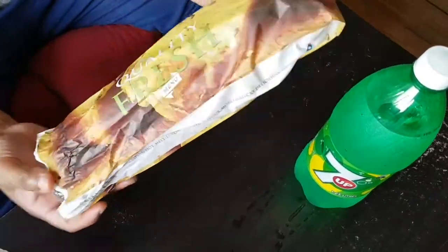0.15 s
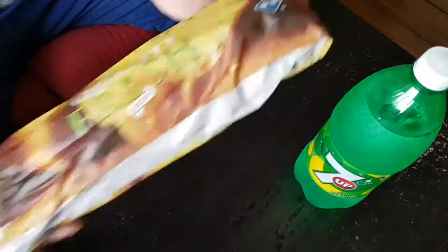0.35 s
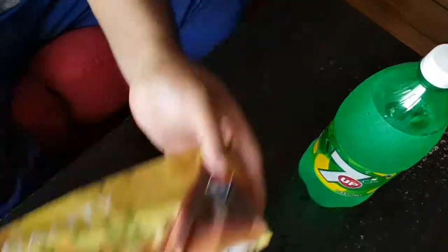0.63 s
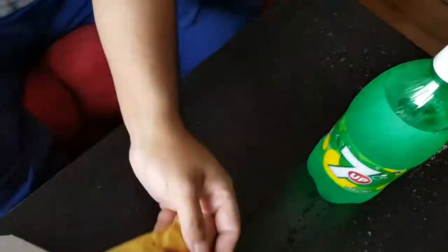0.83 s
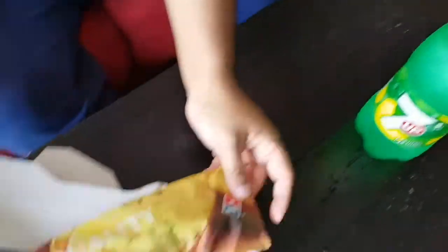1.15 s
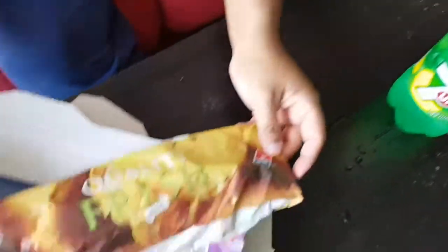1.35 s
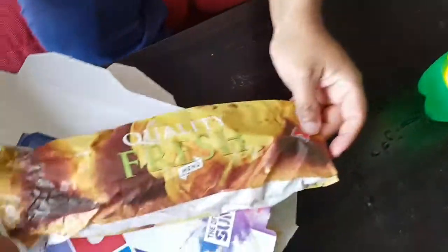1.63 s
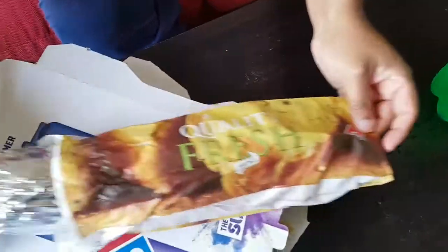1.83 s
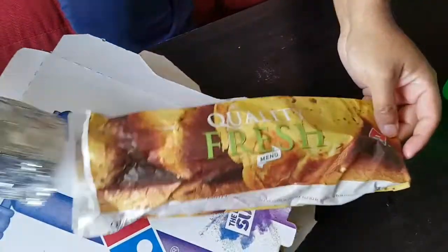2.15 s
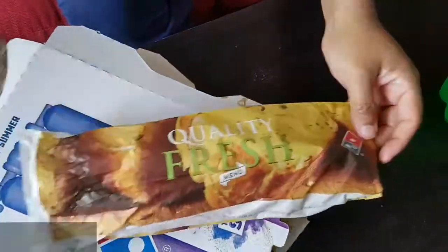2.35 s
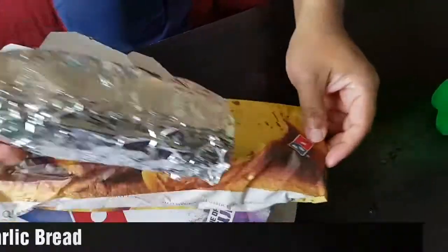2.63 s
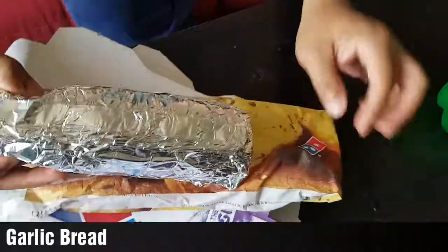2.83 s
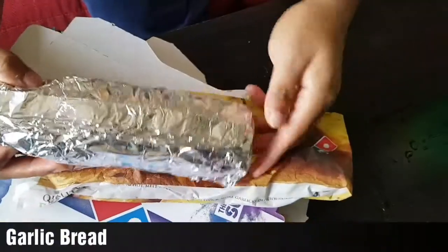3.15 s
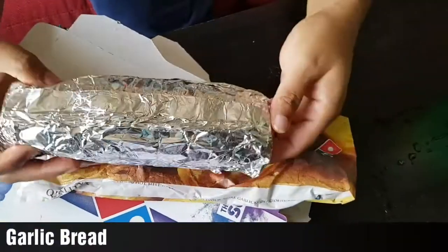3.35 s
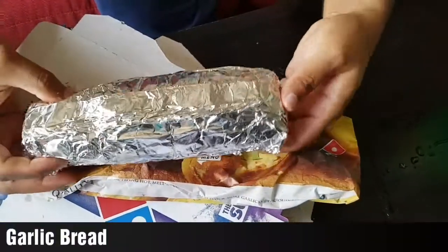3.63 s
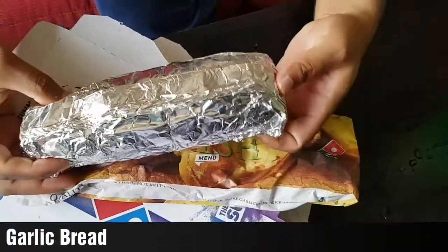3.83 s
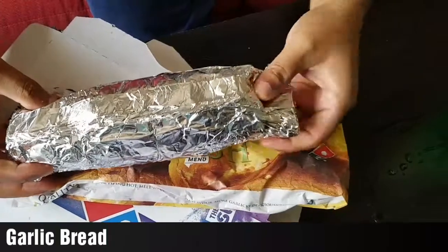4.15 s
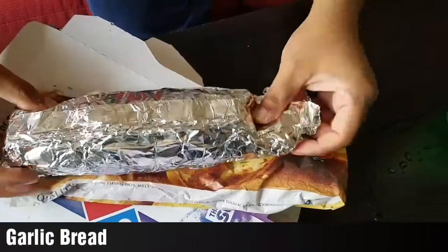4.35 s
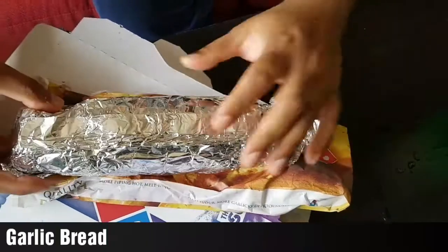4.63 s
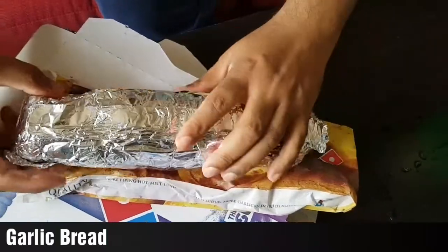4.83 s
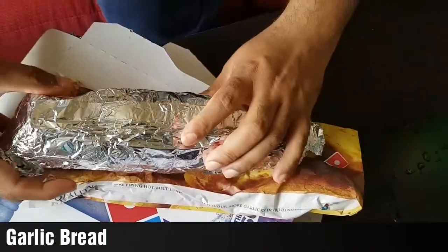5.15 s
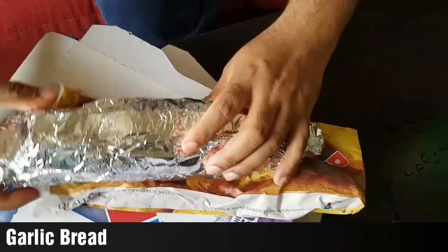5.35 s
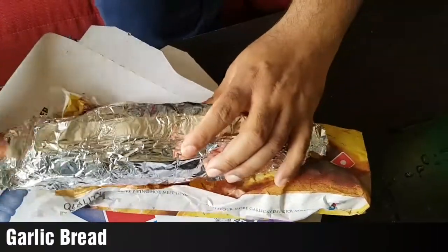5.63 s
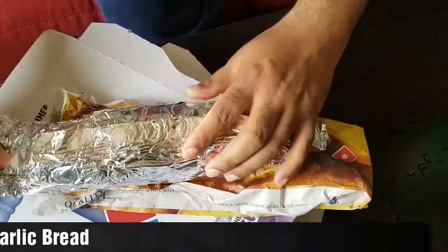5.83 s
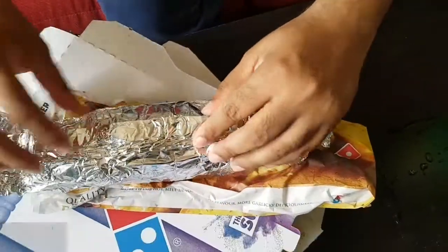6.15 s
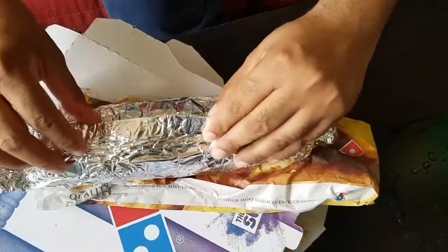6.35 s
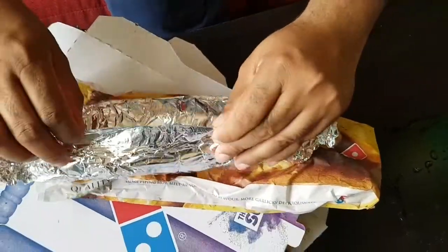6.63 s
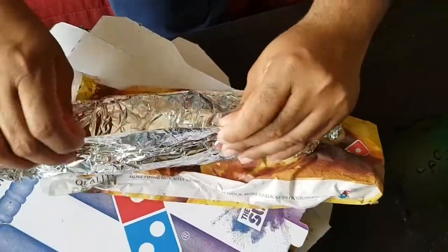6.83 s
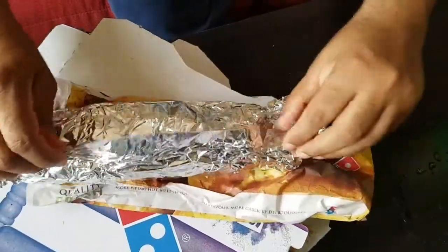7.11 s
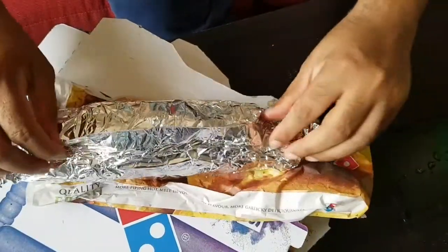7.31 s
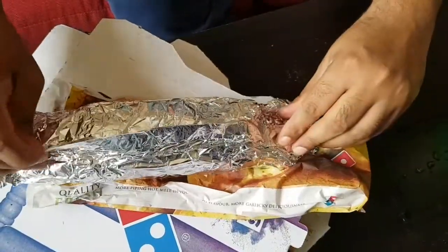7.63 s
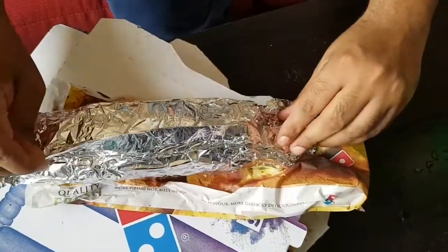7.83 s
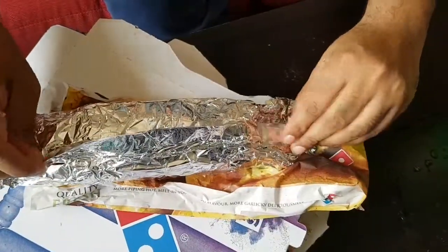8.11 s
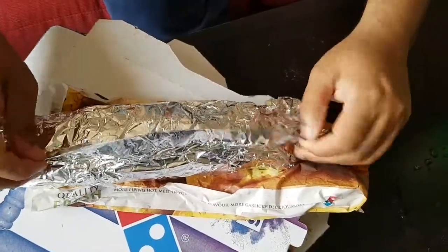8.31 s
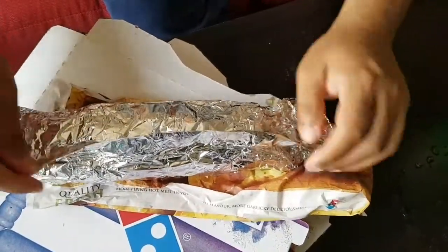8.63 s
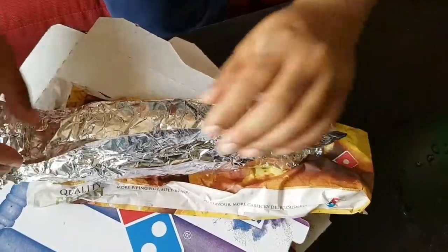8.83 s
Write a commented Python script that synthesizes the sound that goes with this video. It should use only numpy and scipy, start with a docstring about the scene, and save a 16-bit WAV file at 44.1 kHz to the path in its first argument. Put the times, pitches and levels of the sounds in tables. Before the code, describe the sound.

A paper bag crackles in busy hands, a loaf wrapped in foil slides out with a rasp, then the foil crinkles and snaps open indoors.

```python
"""Crackling paper and foil: hands turn a paper bag, slide a foil-wrapped loaf out and peel the foil open.
Big creases snap singly: noise and a jolt ring a panel while the edge cracks.
Small creases come in clumps as a rustle: random clicks ring banks of resonators.
A hollow hum and a gliding finger rub, both foil, join in a small room with short echoes and a faint hush.
Two microphone ports a few centimetres apart hear each crease with its own lag and balance."""
import sys
import numpy as np
from scipy import signal
from scipy.fft import rfft, irfft
from scipy.io import wavfile

SR = 44100
rng = np.random.default_rng(int(sys.argv[2]) if len(sys.argv) > 2 else 0)


def put_to_file(sound):
    """Save the sound as 16-bit audio at rate SR, in the file named by the first command-line argument."""
    columns = np.atleast_2d(sound).T  # one column per channel
    safe = np.clip(columns, -1, 1)
    whole_steps = np.round(safe * 32767)
    wavfile.write(sys.argv[1], SR, whole_steps.astype(np.int16))


N = 395577

# Faint hush of the room: hz, level_db (relative, per Hz)
ROOM_TONE = [(15, -35), (25, 10), (48, 6), (185, 5.5), (354, -3), (659, -1), (863, -17), (16000, -15)]
ROOM_TONE_DB = -58   # rms ahead of the microphone
ROOM_T60_S, ROOM_TREBLE_T60_S = .36, .33   # time for the echoes to fall 60 dB
ROOM_DB = -9.5   # echo gain on the mean of the two ports

# Colour of the microphone: hz, level_db
MICROPHONE = [(20, -4.5), (5000, 0.5), (7500, -8.5), (11000, -4), (15000, -9), (16000, -31), (20000, -15)]
# Colour difference of the ports: hz, left_minus_right_db
PORT_BALANCE = [(60, -2), (700, 1), (1300, 1.5), (2400, 2), (4400, -6.5), (7000, 0.5), (15000, 1)]
CUTOFF_HZ = 16800   # edge of the stopband
PORT_LAG_S = .00012   # spread of a small crease's lag between the ports
LAG_S_PER_DB = .00002   # a big crease reaches the louder port earlier

# Finger rubbing along the foil: start_s, pitch_hz, level_db (the wavering adds about 5 dB)
RUB = [(5.86, 564, -58), (5.916, 618.5, -53), (5.965, 753, -48), (6.0, 865, -70)]
RUB_WIDTH_HZ = 57   # how fast the tone wavers

# Light handling under everything: start_s, body_db, treble_db (rustle drive, ahead of layer trims)
TOUCH = [(0, -47, -51), (0.299, -48, -58), (.75, -43.5, -49.5), (1.1, -48, -54.5), (1.4, -40.5, -47),
         (2.151, -34, -35), (2.33, -49, -50.5), (3.5, -50.5, -51.5), (4.0, -52, -47.5), (4.439, -32, -36),
         (4.75, -50, -55), (5.15, -50.5, -48), (5.5, -38.5, -40.5), (6.05, -40, -40.5), (6.37, -61, -62),
         (6.65, -40, -44), (7.3, -38.5, -44), (7.899, -43, -44), (8.129, -51.5, -52.5),
         (8.381, -35.5, -35.5), (8.64, -44.5, -48.5), (8.89, -63, -100), (8.97, -44.5, -39.5)]
# A hand squeezes, pulls or folds: start_s, length_s, body_db (drive), treble_db (against the body)
GRIPS = [(0, 0.046, -33.5, -4), (0.126, 0.011, -38.5, -5), (0.393, 0.012, -44, -7),
         (0.479, 0.0079, -32.5, -8), (0.548, 0.02, -45.5, -3.5), (0.82, 0.09, -28.5, -8.5),
         (1.093, 0.015, -44, -7.5), (1.206, 0.023, -36, -9.5), (1.298, 0.011, -36.5, -7.5),
         (1.398, 0.03, -30, -9), (1.496, 0.015, -31, -5.5), (1.592, 0.085, -32.5, -3.5),
         (1.789, 0.23, -29.5, 0.5), (2.115, 0.015, -45, -4), (2.45, 0.015, -35.5, -7),
         (2.745, 0.11, -28.5, -6.5), (3.111, 0.061, -33, -7.5), (3.227, 0.059, -31.5, -1.5),
         (3.568, 0.017, -40, -3), (3.703, 0.079, -40.5, -4.5), (3.848, 0.016, -37, -18),
         (4.441, 0.13, -31.5, -5), (4.885, 0.016, -32.5, -6), (4.946, 0.011, -32.5, -4.5),
         (5.044, 0.056, -42.5, -8), (5.517, 0.029, -36, -4), (5.839, 0.01, -35, -2.5),
         (5.924, 0.03, -35, -3), (6.008, 0.016, -36, 0), (6.882, 0.02, -36, -5), (6.992, 0.028, -32.5, -3),
         (7.102, 0.035, -33, -6.5), (7.505, 0.068, -34.5, -4), (7.632, 0.022, -39, 0),
         (8.361, 0.03, -33.5, -9.5), (8.67, 0.043, -36.5, -2)]
GRIP_DB_PER_S, LET_GO_DB_PER_S = 610, 207   # how fast a grip builds, and how fast the sheets settle after it

# The loaf slides out of the bag, rubbing evenly: start_s, share (0-1; end values hold outside the table)
SLIDE = [(1.76, 1), (1.81, 0.87), (2.05, 1), (2.09, 0.2)]
# Low flapping of the whole bag: start_s, level_db (against the body drive)
FLAP = [(0, -9), (1.5, -10.5), (2.2, -12.5), (3, -12.5), (4, -11), (6.5, -14.5), (9, -15)]
# Hum of the hollow foil tube: start_s, level_db (against a body drive of -45 dB)
TUBE = [(0, -19), (2.75, -13), (3.0, -5), (3.9, -5), (4.5, -3), (5.6, -4), (6.3, -22), (9, -22)]
# Whole-sheet motion: hz, level_db (relative)
SHEET = [(45, -24), (90, -4), (170, 4), (340, 4)]
# Panels of the sheets: hz, level_db (relative)
BODY = [(400, -7), (600, -1.5), (1000, -4), (1600, -6), (2300, -2), (3200, -4.5)]
# Sharp crease edges: hz, level_db (relative)
TREBLE = [(3200, -10), (4800, -9.5), (7500, -5.5), (11500, -9), (15000, -6)]

# Big single snaps: start_s, level_db (panel peak, ahead of SNAP_TRIM_DB), pitch_hz (panel),
# crack_db (about the crack's rms, against the panel's peak), pan_db (left minus right)
SNAPS = [(0.058, -19, 1020, -11, 5), (0.072, -28.5, 440, 7, -3.5), (0.13, -22.5, 444, 0.5, 2),
         (0.231, -29, 4850, -6, -4), (0.276, -24.5, 1510, -3.5, -3), (0.304, -21, 715, 0.5, -2.5),
         (0.388, -25.5, 1890, -1.5, 0), (0.405, -32, 2830, -14, 0), (0.455, -23, 650, -28, 2),
         (0.474, -15.5, 1230, -0.5, -2), (0.49, -21.5, 2350, -3, -4), (0.574, -22, 1510, -9, -6),
         (0.606, -24.5, 1150, -5, 2), (0.613, -19.5, 4840, -8, -2), (0.651, -38, 2800, 8, -0.5),
         (0.669, -24, 1400, -15, -2), (0.697, -18, 1660, -17, 2), (0.719, -14, 1430, -8.5, -2),
         (0.7435, -11.5, 1900, -10, 4), (0.755, -9.5, 2300, -21, 2), (0.812, -12.5, 2090, -2, 4),
         (0.831, -14, 1900, -15, -1.0), (0.853, -16, 940, -4, -1), (0.871, -12, 800, 0, 5.5),
         (0.907, -10, 1260, -3.5, 3), (0.921, -12, 1040, -7, 3), (1.094, -16, 680, -17, 2),
         (1.183, -21, 2570, -10, -2.5), (1.206, -23.5, 555, -26, 6), (1.239, -23, 820, -20, -3),
         (1.26, -15.5, 5170, -3.5, -1.5), (1.279, -24, 745, -25, -1), (1.299, -14.5, 1360, -23, -2),
         (1.386, -16, 990, -8, -1), (1.397, -15.5, 4200, -11, -2), (1.453, -20.5, 810, -28, -1.5),
         (1.467, -15, 1730, -6, -7), (1.507, -11.5, 1520, -21, -5), (1.518, -10, 1550, -10, -1.5),
         (1.574, -17, 1240, -6, 0), (1.583, -11, 1160, -7, -3), (1.59, -18, 3500, -15, 2),
         (1.62, -14, 3920, -9, 4), (1.678, -22.5, 438, -25, 0), (1.6915, -8.5, 1350, -37, 3.5),
         (1.734, -12, 1510, -6.5, -5), (1.761, -16, 1560, -9, 3), (1.788, -13, 1260, -4, -4),
         (1.814, -10.5, 3400, -24, 1), (2.103, -8.5, 1270, -20, 0), (2.224, -27, 1020, -13, -2),
         (2.385, -29.5, 1070, -2, -10), (2.445, -30, 407, -22, 1), (2.47, -19.5, 1260, -2, 1),
         (2.559, -27.5, 1250, -26, -5), (2.628, -27.5, 1160, -22, 2), (2.66, -18, 3850, -12, 3),
         (2.736, -13, 985, -5.5, -1), (2.748, -12.5, 3860, -6, 7.5), (2.783, -16, 3630, -18, -2),
         (2.795, -12.5, 2540, -21, 1), (2.821, -12.5, 980, -4, -3), (2.849, -12, 1140, -19, 2),
         (2.866, -17, 990, -26, 6), (2.9, -24, 980, -1.5, 1), (2.907, -20, 1960, -13, -3),
         (3.09, -20.5, 914, -32, 2), (3.113, -17, 1390, -8, 4), (3.122, -14, 3930, -14, 0),
         (3.154, -13, 3360, -5, 1.5), (3.2125, -17, 4470, -18, -9), (3.222, -20, 2480, -16, 0),
         (3.232, -31, 2200, -10, -8), (3.247, -13, 1310, -15, 4.5), (3.261, -4.5, 5070, -11, 2),
         (3.2915, -18.5, 4200, -15, -1), (3.444, -24.5, 1130, -24, 7), (3.572, -18, 1120, -8, -1),
         (3.721, -21, 990, -5, 0), (3.765, -14.5, 1800, -9, -3.5), (3.842, -17.5, 1920, -16, -1.5),
         (3.866, -19.5, 3000, -4, -2.5), (4.003, -28, 1000, -4, -4), (4.066, -19.5, 4610, -20, 3),
         (4.105, -10, 4750, -17, 4), (4.128, -11.5, 2770, -20, -3.5), (4.142, -11, 1230, -7.5, 2.5),
         (4.26, -20, 920, -5, 0), (4.357, -20, 1070, -20, 1), (4.406, -17, 640, -5, 0),
         (4.428, -24, 1230, -21, -2), (4.47, -15.5, 745, -30, 2), (4.493, -16, 1370, -9, -7),
         (4.512, -17.5, 1700, 0, -2.5), (4.543, -9.5, 1390, -8.5, -3.5), (4.631, -23, 1250, -35, -6),
         (4.723, -26.5, 960, -5, -1.5), (4.834, -25, 970, -13, -1), (4.877, -13, 1600, -10.5, -2.5),
         (4.891, -21.5, 990, 0, 8), (4.929, -19.5, 725, -4, -1), (4.9435, -2.5, 2680, -11, 3),
         (5.049, -34, 5500, 3, -3.5), (5.063, -20, 520, -20, 2), (5.093, -22, 1160, -14, 4),
         (5.121, -32, 4850, 3, 5.5), (5.16, -15.5, 4570, -27, 6.5), (5.211, -31, 1280, 4.5, 1),
         (5.304, -19.5, 2000, -6, -2.5), (5.353, -21.5, 1250, 1.5, 1), (5.377, -17.5, 4940, -1, 3),
         (5.416, -23.5, 1320, 1, 1), (5.482, -15.5, 1450, 1, -2), (5.514, -18, 1820, -24, 5),
         (5.53, -19, 1400, -10, 4), (5.556, -14.5, 1230, -8, 5.5), (5.574, -22, 5800, 1, 4),
         (5.589, -12.5, 1270, -35, 9), (5.597, -16, 1810, -36, -6), (5.621, -25, 1530, -5, 0),
         (5.733, -37, 3560, -15, 0), (5.753, -22, 1340, -28, 4), (5.778, -24.5, 770, 0, 2),
         (5.802, -19, 600, -3, 2), (5.83, -25, 4700, 9, -0.5), (5.866, -27, 2200, -18, 0),
         (5.884, -16.5, 1790, -9, 5.5), (5.937, -18, 644, -12, 3), (5.955, -13, 1080, -10, 2),
         (6.0, -25, 4570, -10, -4), (6.01, -12, 1090, -8, 1.5), (6.065, -19, 5800, -18, -1.5),
         (6.114, -20, 3480, -12, 3), (6.143, -19, 824, -16, -1), (6.197, -21.5, 3820, -24, -1.5),
         (6.232, -25.5, 5150, -6, -1.5), (6.457, -21, 4400, -13, -6), (6.494, -20, 935, -13, 1),
         (6.527, -37.5, 2500, 8, 7), (6.625, -16.5, 2560, -8, 1.5), (6.701, -26, 710, -4, -3.5),
         (6.766, -20, 1350, -15, 2), (6.773, -17, 5150, -8, -2), (6.844, -25, 1300, -3, 2),
         (6.872, -24, 4290, -8, -1), (6.887, -3.5, 4180, -28, 5), (6.93, -20.5, 764, -3, -1),
         (6.976, -19, 5000, -8, -1), (6.994, -11.5, 1440, -16, -1), (7.032, -27, 4200, -15, 1),
         (7.137, -18, 2400, -20, 2), (7.192, -24, 5500, -8, -1), (7.216, -22, 870, -7, 0),
         (7.226, -22.5, 1270, -2.5, -3), (7.3, -23, 5040, -8, -3), (7.305, -14.5, 2020, -5, -3),
         (7.376, -20, 2580, -6, 1), (7.479, -21.5, 870, -17, 1), (7.504, -20, 1350, -17, 5),
         (7.624, -14.5, 2520, -5.5, -3.5), (7.655, -30, 2700, -12, -3), (7.754, -28, 4460, -3, -2),
         (7.781, -24, 1230, -12, 1), (7.853, -26, 1190, -1, 0), (7.872, -22, 3300, -4.5, -3),
         (7.902, -25, 990, -4, 1), (7.98, -15, 1480, -3.5, -3), (7.988, -22, 1530, -18, 5),
         (8.032, -19, 3160, -16, 4), (8.066, -11.5, 1970, -19, -1.5), (8.099, -29, 4400, -4, -3),
         (8.163, -24, 4200, -11, -2), (8.199, -26, 4800, -3, 4), (8.267, -21.5, 1540, -0.5, 1),
         (8.328, -17, 2440, -12, -2), (8.357, -17, 3200, -4, 5.5), (8.389, -21.5, 1440, 3, -3.5),
         (8.411, -14.5, 1250, -14, 0), (8.462, -27, 945, -23, -1.5), (8.486, -25, 3500, -19, -7),
         (8.538, -29, 5050, 2, -4.5), (8.594, -25, 1390, -7, -1), (8.684, -18, 820, -19, 1),
         (8.798, -29.5, 5540, 2.5, 3.5), (8.935, -24.5, 4900, -15, 6)]
SNAP_TRIM_DB = -4.0
CRACK_CREST_DB = 14   # lifts crack_db to a peak level
KICK = 1.12   # jolt against the noise of the yielding panel
# Small snaps: level above the body drive, its largest deviation either way, and crack_db as above
SMALL_SNAP_DB, SMALL_SNAP_SPREAD_DB, SMALL_CRACK_DB = 19, 3, -19


def from_db(db):
    """Decibels to gain."""
    return 10 ** (np.asarray(db) / 20)


def rms_one(x):
    """Scales to rms 1."""
    return x / np.sqrt(np.mean(x ** 2) + 1e-20)


def peak_one(x):
    """Scales to peak 1."""
    return x / abs(x).max()


def at_hz(points, hz):
    """Reads a (hz, value) outline on a log-frequency axis."""
    point_hz, values = np.transpose(points)
    return np.interp(np.log(hz), np.log(point_hz), values)


def shaped(x, points, share=1):
    """Colours x by a share of a (hz, level_db) outline."""
    hz = np.maximum(np.arange(N // 2 + 1) * SR / N, 1)
    return irfft(rfft(x) * from_db(share * at_hz(points, hz)), N)


def drift(rate_hz):
    """Slow random wander of spread 1: noise at every 40th sample through two one-pole low-passes."""
    r = np.exp(-80 * np.pi * rate_hz / SR)
    noise = rng.standard_normal(N // 40 + 2002)
    slow = signal.lfilter([1], [1, -2 * r, r * r], noise)[2000:]   # drops the run-in
    return np.interp(np.arange(N) / 40, np.arange(len(slow)), rms_one(slow))


def ring(clicks, hz, cycles):
    """A resonator falls 60 dB in the given cycles; a unit click gives unit energy at every pitch."""
    r = from_db(-60 * hz / (cycles * SR))
    w = 2 * np.pi * hz / SR
    gain = np.sqrt(1 - r * r)
    return signal.lfilter([gain, 0, -gain], [1, -2 * r * np.cos(w), r * r], clicks + 1e-18)


def room_tone():
    """A faint steady hush: coloured noise, partly alike at both ports."""
    noise = rng.standard_normal((2, N)) + 0.54 * rng.standard_normal(N)
    return from_db(ROOM_TONE_DB) * rms_one(shaped(noise, ROOM_TONE))


def room(x):
    """Dense echoes as dying noise after a short gap; treble dies first, bass is mostly alike at both ports."""
    t = np.arange(SR // 2) / SR
    shared, own = rng.standard_normal(len(t)), rng.standard_normal((2, len(t)))
    bass = signal.butter(1, 1200, fs=SR)
    low = signal.lfilter(*bass, shared + 0.31 * own)
    high = own - signal.lfilter(*bass, own)
    echoes = low * from_db(-60 * t / ROOM_T60_S) + high * from_db(-60 * t / ROOM_TREBLE_T60_S)
    echoes = echoes * (t > .003) / np.sqrt(np.sum(echoes ** 2) / 2)
    mono = x.mean(axis=0)[None]
    return from_db(ROOM_DB) * signal.fftconvolve(mono, echoes, axes=1)[:, :N]


def rub():
    """A finger on foil: a hollow tone follows the pitch table, wavering in level and phase."""
    t = np.arange(N) / SR
    s, hz, level_db = np.transpose(RUB)
    phase = 2 * np.pi * np.cumsum(np.interp(t, s, hz)) / SR
    tone = (2 + drift(RUB_WIDTH_HZ)) * np.cos(phase) + drift(RUB_WIDTH_HZ) * np.sin(phase)
    return from_db(np.interp(t, s, level_db, left=-200, right=-200)) * tone


def handling():
    """Rustle drive in dB, body and treble: powers of the light touch and each grip's rise, hold and release."""
    t = np.arange(0, N + 50, 50) / SR
    s, *columns = np.transpose(TOUCH)
    power = np.array([from_db(2 * np.interp(t, s, c)) for c in columns])
    for start_s, length_s, body_db, treble_db in GRIPS:
        rise_db = GRIP_DB_PER_S * np.maximum(start_s - t, 0)
        release_db = LET_GO_DB_PER_S * np.maximum(t - start_s - length_s, 0)
        grip_db = body_db - rise_db - release_db + np.array([[0], [treble_db]])
        power += from_db(2 * grip_db)
    return [np.interp(np.arange(N) / SR, t, 10 * np.log10(p)) for p in power]


def avalanches(per_s, fade_s):
    """One crease sets off its neighbours: sudden swells fade over a steady floor; rms 1."""
    starts = (rng.random(N) < per_s / SR) * np.minimum(rng.exponential(1, N), 2.5)
    swells = signal.lfilter([1], [1, -np.exp(-1 / (fade_s * SR))], starts)
    return rms_one(1.2 + swells)


def ring_bank(at, sizes, outline, cycles, count, patchy_db):
    """Clicks (a time per port) are dealt to resonators spread in log pitch, each favoured now and then."""
    out = np.zeros((2, N))
    dealt = rng.integers(0, count, N)[at[1]]
    for k, hz in enumerate(np.geomspace(outline[0][0], outline[-1][0], count)):
        clicks = np.zeros((2, N))
        mine = dealt == k
        favour = from_db(patchy_db * drift(18.0))[at[1, mine]]
        for side in (0, 1):
            np.add.at(clicks[side], at[side, mine], sizes[side, mine] * favour)
        # log spacing leaves higher resonators a wider band to fill
        out += from_db(at_hz(outline, hz)) * np.sqrt(hz) * ring(clicks, hz, cycles)
    return rms_one(out)


def rustle(body_db, treble_db):
    """Clumps of small creases move the sheet and set panels, edges and the hollow foil tube ringing."""
    t = np.arange(N) / SR
    slide = np.clip(np.interp(t, *np.transpose(SLIDE)), 0, 1)
    # harder handling buckles more creases
    per_s = np.clip(4000 * from_db(.4 * (treble_db + 45.5)), 2500, 14000)
    clumps = slide + (1 - slide) * avalanches(per_s=95.0, fade_s=0.0056)
    born = np.flatnonzero(rng.random(N) < per_s / SR)

    # rubbing is fine and even; denser creases are smaller
    size_db = (2.6 - 2.34 * slide) * np.minimum(rng.exponential(1, N), 5.0) + 4.4 * slide
    sizes = (from_db(size_db) * clumps * rng.choice([-1, 1], N) / np.sqrt(per_s))[born]

    # each crease has its own direction
    lag = np.round(rng.normal(0, PORT_LAG_S * SR, N)).astype(int)[born]
    at = np.clip(np.array([born + lag, born]), 0, N - 1)
    sizes = sizes * from_db(rng.normal(0, 3.3, N)[born] * np.array([[1], [-1]]))
    # large bodies answer many creases alike
    even = np.sign(sizes) * np.sqrt(abs(sizes) / np.sqrt(per_s[born]))

    flap_db = body_db + np.interp(t, *np.transpose(FLAP))
    sheet = from_db(flap_db) * ring_bank(at, even, SHEET, cycles=4.8, count=7, patchy_db=3.5)
    body = from_db(body_db - 4.0) * ring_bank(at, sizes, BODY, cycles=9.8, count=18, patchy_db=3.5)
    edge_db = treble_db + 4.0 + 0.57 * slide
    edges = from_db(edge_db) * ring_bank(at, sizes, TREBLE, cycles=10.4, count=14, patchy_db=1.0)
    # the hum is steadier than the handling
    tube_db = -45 + .7 * (body_db + 45) + np.interp(t, *np.transpose(TUBE))
    tube_outline = [(1030, 0), (1380, 0)]
    tube = from_db(tube_db) * ring_bank(at, even, tube_outline, cycles=11.5, count=2, patchy_db=2.5)
    return sheet + body + edges + tube


def small_snaps(body_db, count):
    """Lesser creases give way at random moments, their level following the handling; rows as in SNAPS."""
    when, pitch, size, side = rng.random((count, 4)).T
    level_db = body_db[(when * (N - 1)).astype(int)] + SMALL_SNAP_DB
    level_db = level_db + SMALL_SNAP_SPREAD_DB * (2 * size - 1)
    pitch_hz = 600 * 8.0 ** pitch
    crack_db = np.full(count, SMALL_CRACK_DB)
    return list(zip(when * N / SR, level_db, pitch_hz, crack_db, 8.9 * (side - .5)))


def snaps(rows):
    """A crease creaks, then gives way: the panel rings at its pitch, the edge cracks, nearby folds settle."""
    out = np.zeros((2, N + 2000))
    t = np.arange(1500) / SR
    sharp = signal.butter(2, 4500, "high", fs=SR, output="sos")
    since = np.maximum(t - .0015, 0)   # time after the fold gives way
    yielded = since > 0
    creak = 0.48 * t / 0.00091 * (since == 0)
    settling = 0.58 * np.exp(-since / 0.0057) * yielded
    fast = creak + settling + np.exp(-since / 0.0018) * yielded
    for start_s, level_db, hz, crack_db, pan_db in rows:
        noise = rng.standard_normal((3, len(t)))
        slow = creak + settling + np.exp(-since * hz / 1.7) * yielded   # large panels yield for longer
        blow = noise[0] * slow
        # the fold flips in one jolt
        blow[np.argmax(yielded)] += KICK * np.sqrt(SR / hz) * np.sign(noise[0, 0])

        # two resonators in a row: the panel swells, then dies within a few cycles
        panel = peak_one(ring(ring(blow, hz, cycles=8.4), hz, cycles=2.33))
        harsh = min(from_db(crack_db + 18) + hz / 5000, 1)   # dull knocks on large panels stay purer
        panel = panel + 0.8 * harsh * peak_one(ring(blow, hz * rng.uniform(1.4, 1.56), cycles=1.5))
        panel = panel + 0.86 * peak_one(ring(blow, hz * rng.uniform(0.33, 0.76), cycles=1.68))
        crack = signal.sosfilt(sharp, noise[1:] * fast)   # the ports hear unlike edges
        sound = peak_one(panel) + from_db(crack_db + CRACK_CREST_DB) * peak_one(crack)

        lag = round(-LAG_S_PER_DB * SR * pan_db)   # shifts the left port only
        for side, sign in enumerate((1, -1)):
            i = max(round(start_s * SR) + lag * (1 - side), 0)
            gain = from_db(level_db + SNAP_TRIM_DB + sign * pan_db / 2)
            out[side, i:i + len(t)] += gain * sound[side]
    return out[:, :N]


def scene():
    """Sheets, their echoes and the room tone."""
    body_db, treble_db = handling()
    rustling = rustle(body_db, treble_db)
    all_snaps = list(SNAPS) + small_snaps(body_db, count=10)
    sheets = rustling + snaps(all_snaps) + rub()
    return sheets + room(sheets) + room_tone()


def record(dry):
    """The microphone dips near 7 kHz, its ports differ in colour; a steep low-pass cuts the top."""
    dry = shaped(dry, MICROPHONE)
    ports = np.array([shaped(dry[0], PORT_BALANCE, .5), shaped(dry[1], PORT_BALANCE, -.5)])
    return signal.sosfilt(signal.cheby2(12, 70, CUTOFF_HZ, fs=SR, output="sos"), ports)


dry = scene()
out = record(dry)
put_to_file(out)
```